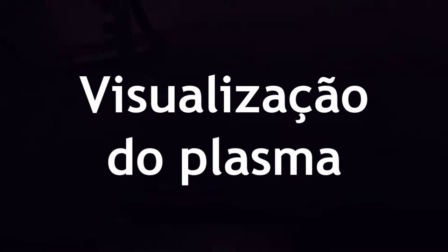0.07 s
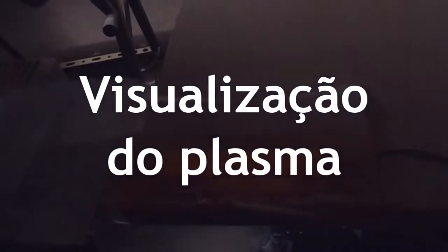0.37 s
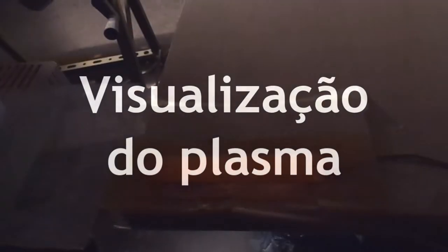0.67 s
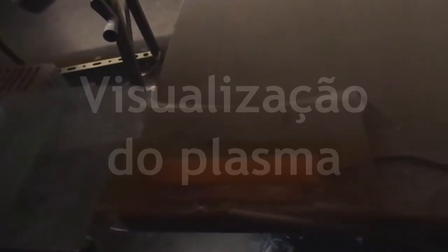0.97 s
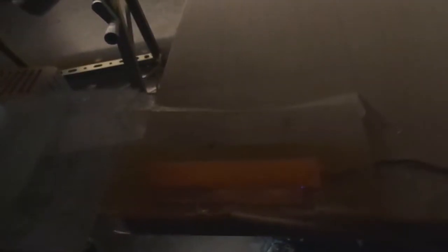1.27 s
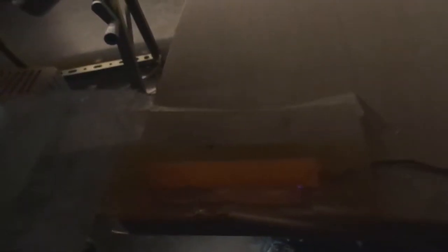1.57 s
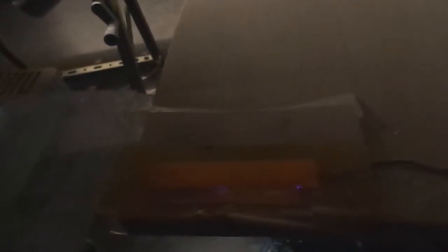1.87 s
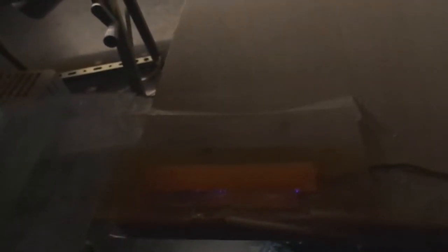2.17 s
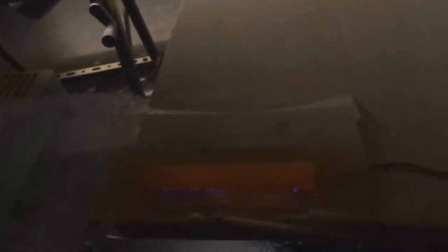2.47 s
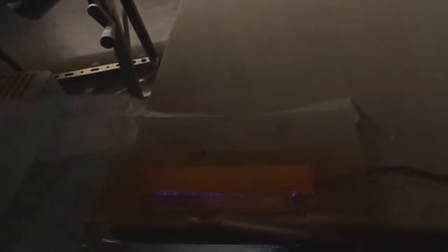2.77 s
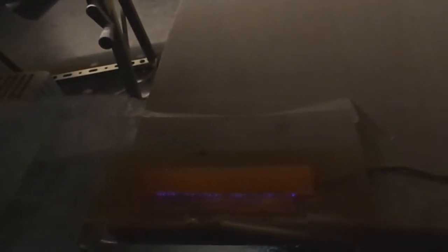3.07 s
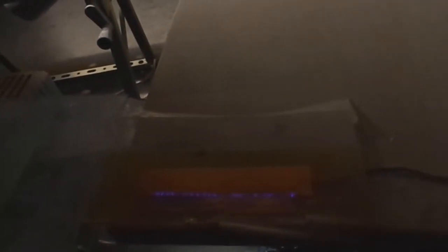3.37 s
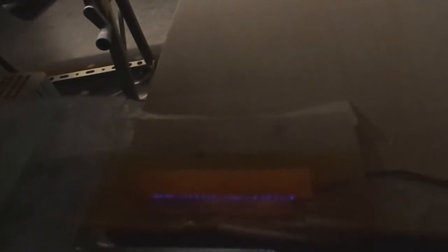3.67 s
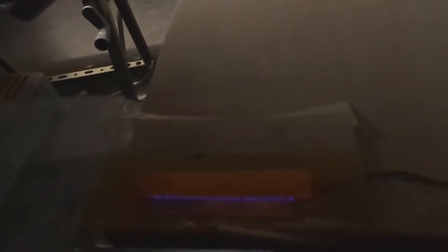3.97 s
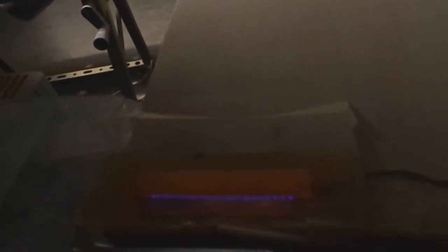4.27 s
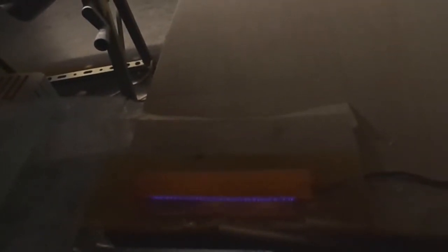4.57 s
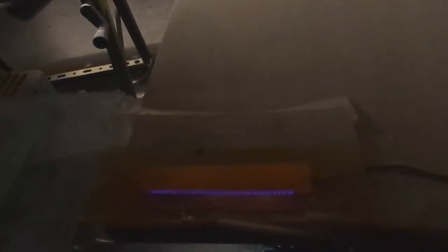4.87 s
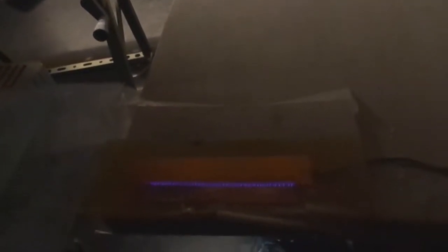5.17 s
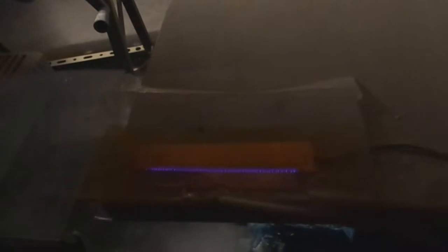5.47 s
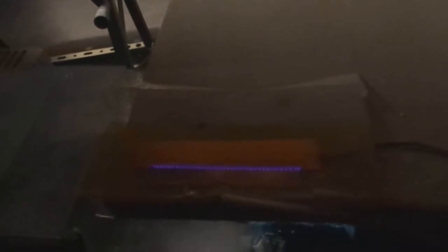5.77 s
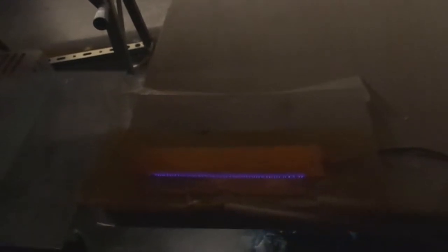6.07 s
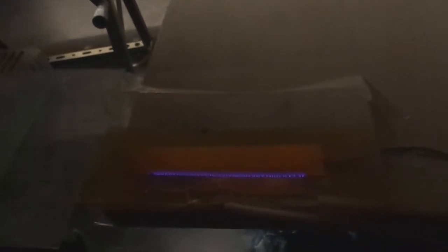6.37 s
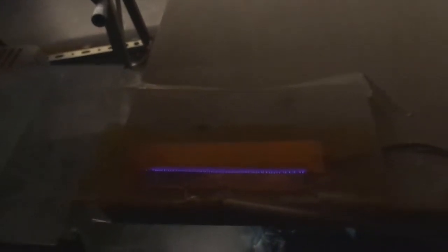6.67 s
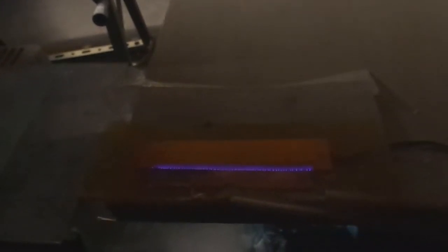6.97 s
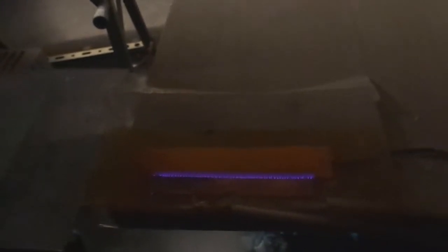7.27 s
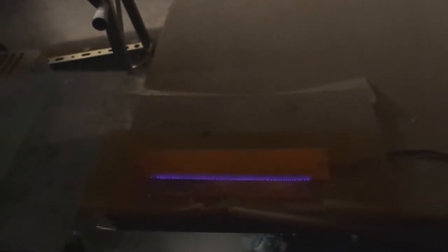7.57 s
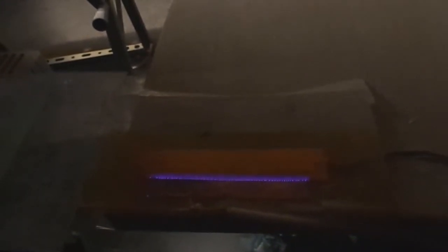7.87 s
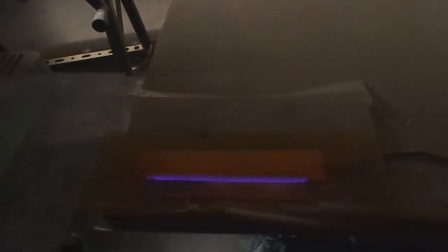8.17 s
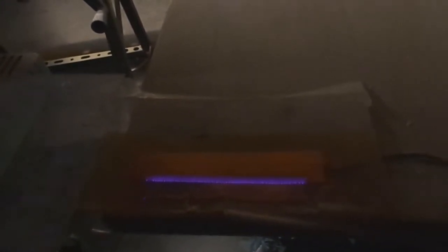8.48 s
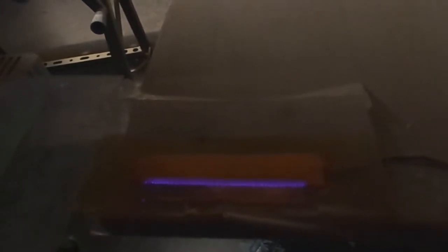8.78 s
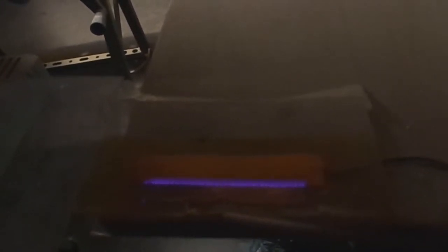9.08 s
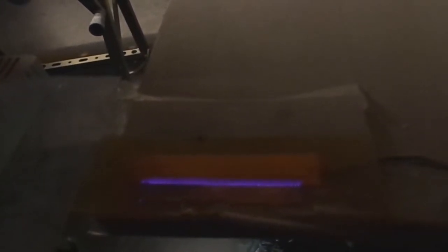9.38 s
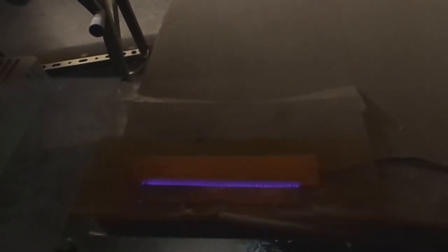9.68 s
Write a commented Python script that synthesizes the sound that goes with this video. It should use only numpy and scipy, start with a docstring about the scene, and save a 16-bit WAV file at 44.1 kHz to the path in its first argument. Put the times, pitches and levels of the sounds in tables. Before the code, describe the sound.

It opens in silence. At about 0.7 seconds the quiet sound of a small, hard room cuts in: a steady rush of cooling air, a faint low hum, a thin high tone and a nearby motor rapidly rattling a loose metal part. From about 1.2 seconds a fine electrical fizz from a plasma strip rises in several quick steps, reaching a clear hiss by 3 seconds. It dips slightly, then from about 3.5 seconds grows slowly fuller and brighter, becoming the main sound and staying strongest from 9 seconds to the end. The metallic rattle continues underneath, surging briefly around 2, 4, 7 and 9 seconds. Light, irregular metal knocks cluster between 0.8 and 2.4 seconds and recur now and then until about 8 seconds. Everything is heard through one microphone, with very little reverberation.

```python
"""A strip of plasma on a lab bench: as the voltage is turned up, ever more micro-sparks merge from a
faint fizz into a bright hiss. Nearby a motor, probably a pump's, turns about 30 times a second and
rattles a loose metal part, and its drive gives a faint high tone. The room is small and hard, with
cooling air and a low hum for room tone. One microphone, switched in after a short silence."""
import sys
import numpy as np
from scipy import signal
from scipy.fft import rfft, irfft
from scipy.io import wavfile
from scipy.ndimage import uniform_filter1d

SR = 44100
rng = np.random.default_rng(int(sys.argv[2]) if len(sys.argv) > 2 else 0)


def store_pcm(level_fs):
    """Save levels as 16-bit WAV."""
    pcm = np.round(np.clip(level_fs, -1, 1) * 32767).astype(np.int16)
    wavfile.write(sys.argv[1], SR, np.atleast_2d(pcm).T)


N = 428211
TIME = np.arange(N) / SR
FREQS = np.fft.rfftfreq(N, 1 / SR)
TURNS_PER_S = 29.956

# turn-ups of the voltage, quick at first and slower later: start_s, length_s, glow_rise_db
VOLTAGE_STEPS = [(1.15, .15, 3.5), (1.47, 0.24, 4.5), (2.269, .06, 2.5), (2.772, .11, 3),
                 (5.15, 1.02, 1.41), (6.301, .62, 2), (7.099, 1.95, 1.8)]
# colour of the sparks while they are few: frequency_hz, gain_db
FIZZ_SPECTRUM = [(300, -24), (2000, -10.5), (4000, -5.8), (5500, -4.3), (7200, -4.7), (8400, -2),
                 (9400, -3), (11300, -2.2), (12500, -.8), (15000, -1.5)]
# their colour once the glow covers the strip: frequency_hz, gain_db
HISS_SPECTRUM = [(150, -14), (1200, -11), (2200, -5.5), (4600, -4), (5600, -2), (7200, -3.2), (8300, -1),
                 (9500, -2.2), (12500, -.4), (15000, -1.8)]
# narrow bands that the plate and bench lift in the hiss: centre_hz, width_hz, lift_db
BENCH_BANDS = [(2200, 160, 3.5), (2800, 150, 1.5), (3800, 170, 2.5), (4230, 150, 2), (5200, 180, 1.3),
               (8400, 500, .8), (10350, 550, 3), (13750, 700, 2)]
# where the loose part touches, and how hard before and after it shifts its seat:
# place_turns, force_before_db, force_after_db
CONTACTS = [(.125, -10, -2.5), (0.674, 0, -7), (.885, -1.5, 1)]
# ringing modes of the loose part: pitch_hz, width_hz, gain_db
METAL_MODES = [(770, 125, -14.5), (1234, 83, -11.5), (1500.5, 133, 1.5), (1647, 110, 0.5),
               (2316, 210, -15.5), (2790, 180, -13.5), (3200, 360, -16.5), (4030, 620, -22),
               (6100, 460, -18.5)]
# surges of the rattle: middle_s, length_s, lift_db
RATTLE_SURGES = [(2.35, 1.6, 2.5), (4.07, 0.26, 3.5), (6.581, .14, 2.5), (7.1, 0.54, 3.5),
                 (8.678, .11, 5.5), (8.969, .12, 5)]
# hardest knocks of the loose part: start_s, strength_db
HARD_KNOCKS = [(0.837, -41), (0.8909, -40), (1.6973, -38), (1.8586, -39), (1.999, -40), (2.0258, -42),
               (2.2634, -40), (2.359, -40), (2.3994, -40), (3.4988, -39), (4.067, -38), (4.7666, -43),
               (5.035, -38.5), (5.1744, -42), (6.5804, -39), (7.2072, -38), (8.182, -37)]
# low tones of the machines: pitch_hz, resting_level_db
HUM_TONES = [(59.9, -84), (79.3, -81), (119.8, -86.5)]
# slow swells of those tones: pitch_hz, middle_s, length_s, lift_db
HUM_SWELLS = [(59.9, 2.2, .65, 8), (79.3, 4.86, 1.45, 8.5), (59.9, 5.55, .55, 7), (79.3, 7.15, 1.2, 9.5),
              (59.9, 9.5, 0.85, 7)]
# colour of the machines' cooling air: frequency_hz, gain_db
AIR_SPECTRUM = [(15, -7), (45, -4), (70, -3), (110, -3.5), (135, -.5), (280, -1), (600, .3), (1100, 0),
                (1700, -1), (2050, -4), (2700, -3), (3900, -7.5), (4600, -14), (9000, -19), (15000, -24)]
# resonances of the motor housing in that air: centre_hz, width_hz, lift_db
HOUSING_BANDS = [(786, 123, 4), (1584, 235, 6.5), (2438, 33, 8), (2795, 84, 4.5)]


def gain_of(db):
    """Decibels to amplitude."""
    return 10 ** (np.asarray(db) / 20)


def unit_rms(x):
    """Scales to rms 1."""
    return x / np.sqrt(np.mean(x ** 2) + 1e-20)


def drift(hz):
    """Slow random wander of rms 1, rolled off above hz."""
    return unit_rms(irfft(rfft(rng.standard_normal(N)) * np.exp(-(FREQS / hz) ** 2), N))


def ramp(start_s, length_s):
    """Goes steadily from 0 to 1 and stays there."""
    return np.clip((TIME - start_s) / length_s, 0, 1)


def swell(middle_s, length_s):
    """One arch, from 0 to 1 and back."""
    return np.sin(np.pi * ramp(middle_s - length_s / 2, length_s))


def coloured(x, spectrum, bands):
    """Gives x a broad spectrum with a few narrow lifts, at rms 1."""
    hz, db = np.transpose(spectrum)
    shape_db = np.interp(np.log(FREQS + 1), np.log(hz), db)
    for centre_hz, width_hz, lift_db in bands:
        shape_db += lift_db * np.exp(-2 * ((FREQS - centre_hz) / width_hz) ** 2)
    return unit_rms(irfft(rfft(x) * gain_of(shape_db), N))


def glow(ignition_db=-65.5, settle_at_s=3.0, settle_s=.55, settle_db=1.7, creep_db_per_s=.413):
    """Strength of the discharge in dB: it steps up with the voltage, sinks a little, then creeps up."""
    turned_db = sum(rise_db * ramp(start, length) for start, length, rise_db in VOLTAGE_STEPS)
    creep_db = creep_db_per_s * np.maximum(TIME - settle_at_s - settle_s, 0)
    return ignition_db + turned_db - settle_db * ramp(settle_at_s, settle_s) + creep_db


def plasma(fizz_db=-53, hiss_db=-47, fizz_sparks_per_s=200000, brisk_db_per_s=4, gain_db=3):
    """Tiny random sparks on the bench: their number and size grow with the glow; their colour fills out."""
    glow_db = glow()
    rise_db_per_s = uniform_filter1d(np.gradient(glow_db, TIME), round(.7 * SR))
    spreading = np.clip(rise_db_per_s / brisk_db_per_s, 0, 1)
    # mains ripple swings the number of sparks, most while the glow spreads
    ripple = 1 + np.sin(2 * np.pi * 100 * TIME) * (.03 + .12 * spreading ** 2)
    per_sample = fizz_sparks_per_s * gain_of(glow_db - fizz_db) / SR
    # sparks that fall within one sample add up in power
    sparks = np.sqrt(rng.poisson(per_sample * ripple) / per_sample) * rng.standard_normal(N)
    fizz = coloured(sparks, FIZZ_SPECTRUM, BENCH_BANDS)
    hiss = coloured(sparks, HISS_SPECTRUM, BENCH_BANDS)
    covered = np.clip((glow_db - fizz_db) / (hiss_db - fizz_db), 0, 1)
    return ((1 - covered) * fizz + covered * hiss) * gain_of(glow_db + gain_db)


def metal_ring(blows):
    """Blows ring the modes of the loose part, with deep valleys between the modes."""
    power = sum(gain_of(db) ** 2 / (1 + ((FREQS - hz) / (.56 * width_hz)) ** 2) ** 2
                for hz, width_hz, db in METAL_MODES)
    log_gain = np.log(np.maximum(power, 1e-9)) / 2
    # minimum phase, so the ring follows the blow
    cepstrum = irfft(log_gain, N) * (1 + np.sign(np.fft.fftfreq(N)))
    return irfft(rfft(blows) * np.exp(rfft(cepstrum)), N)


def contact_blows(chatter_per_s=430, chatter_db=-13.5, jitter_s=.000796, uneven_db=4.5, reseat_s=(4.4, 6)):
    """The motor hits the loose part three times a turn; it chatters between, and shifts its seat once."""
    turns = np.arange(int(N / SR * TURNS_PER_S))
    blows = gain_of(chatter_db) * rng.standard_normal(N) * (rng.random(N) < chatter_per_s / SR)
    for place, before_db, after_db in CONTACTS:
        late, size, side = rng.standard_normal((len(turns), 3)).T
        at_s = (turns + place) / TURNS_PER_S + jitter_s * late
        force_db = np.interp(at_s, reseat_s, [before_db, after_db]) + uneven_db * np.tanh(size)
        blows[np.clip((at_s * SR).astype(int), 0, N - 1)] += np.sign(side) * gain_of(force_db)
    return blows


def rattle(level_db=-60, ease_db_per_s=.07):
    """The loose part rings under the motor's blows, surging now and then and slowly easing."""
    surge_db = sum(lift_db * swell(middle, length) for middle, length, lift_db in RATTLE_SURGES)
    return gain_of(level_db + surge_db - ease_db_per_s * TIME) * unit_rms(metal_ring(contact_blows()))


def in_room(direct, t60_s=.13, tail_db=-8.5):
    """The direct sound reaches the microphone first, then the diffuse tail of a small hard room."""
    t = TIME[:SR // 2]
    tail = rng.standard_normal(len(t)) * gain_of(-60 * t / t60_s) * (t > .004)
    return direct + gain_of(tail_db) * signal.fftconvolve(direct, tail / np.linalg.norm(tail))[:N]


def drive_tone(centre_hz=12258, wander_hz=2, level_db=-71):
    """The motor drive's switching tone; its pitch dips once a turn, with the load."""
    angle = 2 * np.pi * TURNS_PER_S * TIME
    swing_hz = 42 * np.cos(angle) - 16 * np.cos(2 * angle)
    pitch_hz = centre_hz + swing_hz + wander_hz * drift(hz=4)
    return gain_of(level_db) * unit_rms(np.sin(2 * np.pi * np.cumsum(pitch_hz) / SR))


def hum(mains_hz=50, mains_db=-84, wander_hz=.44, waver_db=1.5):
    """Low end of the room tone: steady mains hum, and machine tones that waver and at times swell."""
    tones = gain_of(mains_db) * unit_rms(np.sin(2 * np.pi * mains_hz * TIME))
    for hz, rest_db in HUM_TONES:
        swell_db = sum(lift_db * swell(middle, length)
                       for tone_hz, middle, length, lift_db in HUM_SWELLS if tone_hz == hz)
        phase = 2 * np.pi * np.cumsum(hz + wander_hz * drift(hz=3.6)) / SR
        tones += gain_of(rest_db + swell_db + waver_db * drift(hz=3)) * unit_rms(np.sin(phase))
    return tones


def cooling_air(level_db=-57.5):
    """Steady rush of cooling air in the room, coloured by the motor housing."""
    return coloured(rng.standard_normal(N), AIR_SPECTRUM, HOUSING_BANDS) * gain_of(level_db)


def knocks(band_hz=(1700, 2700), trim_db=-3.7):
    """Hard knocks of the loose part: the shorter contact favours its middle modes."""
    blows = np.zeros(N)
    for start_s, strength_db in HARD_KNOCKS:
        blows[round(start_s * SR)] = gain_of(strength_db + trim_db)
    ring = metal_ring(signal.unit_impulse(N))[:SR // 10]
    knock = signal.lfilter(*signal.butter(1, band_hz, "band", fs=SR), ring)
    return signal.oaconvolve(blows, knock / abs(knock).max())[:N]


def scene():
    """One microphone hears the bench, the nearby motor and the room, so both channels are alike."""
    sound = plasma() + in_room(rattle() + knocks()) + drive_tone() + hum() + cooling_air()
    return np.array([sound, sound])


def record(dry, offset=.0005, switch_in_s=.66, cutoff_hz=15030):
    """The microphone input carries a small steady offset; it is switched in, then low-passed."""
    opened = (dry - offset) * ramp(switch_in_s, length_s=.008)
    lowpass = signal.firwin(2047, cutoff_hz, window=("kaiser", 9), fs=SR)
    return signal.oaconvolve(opened, lowpass[None], "same")


dry = scene()
out = record(dry)
store_pcm(out)
```